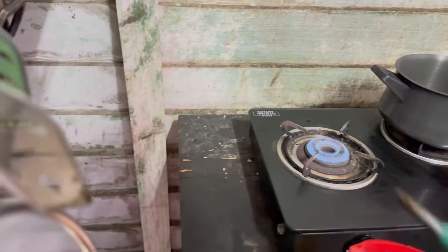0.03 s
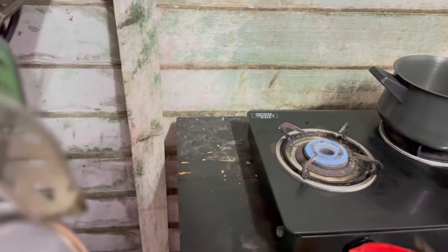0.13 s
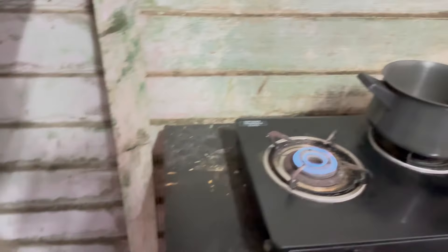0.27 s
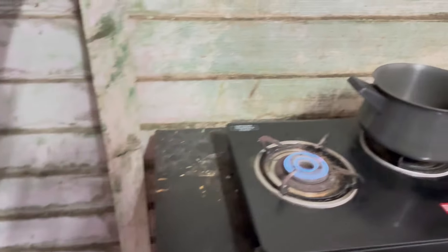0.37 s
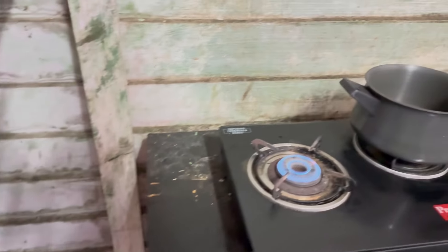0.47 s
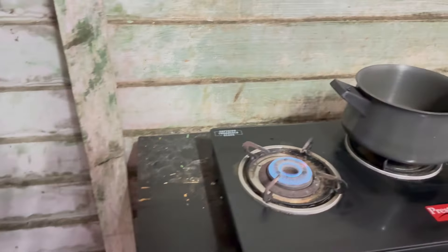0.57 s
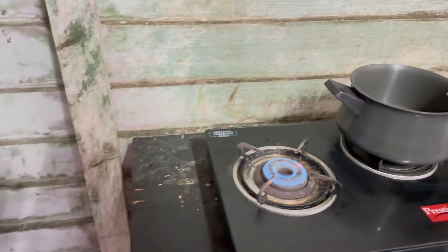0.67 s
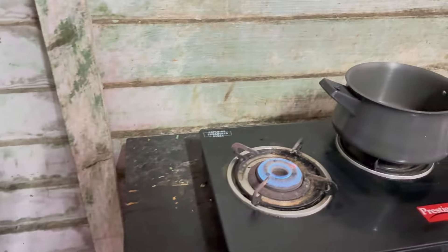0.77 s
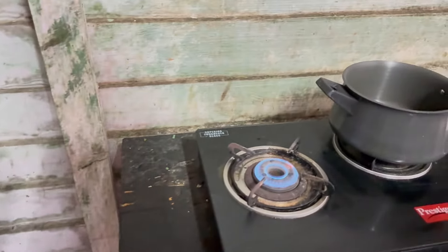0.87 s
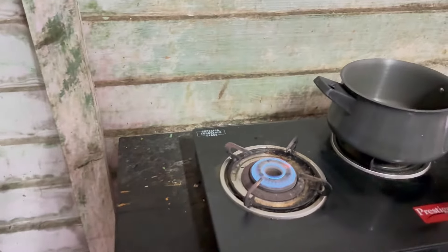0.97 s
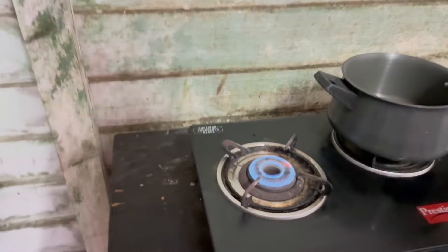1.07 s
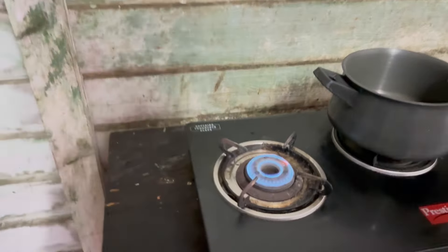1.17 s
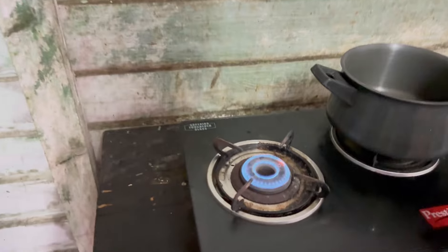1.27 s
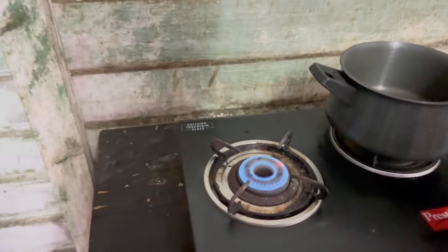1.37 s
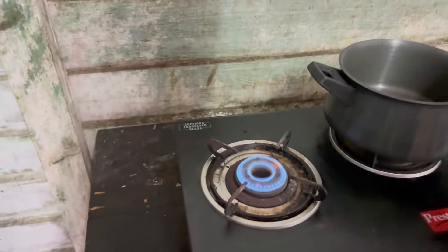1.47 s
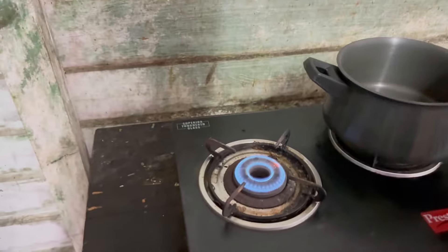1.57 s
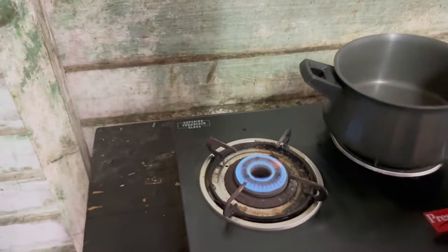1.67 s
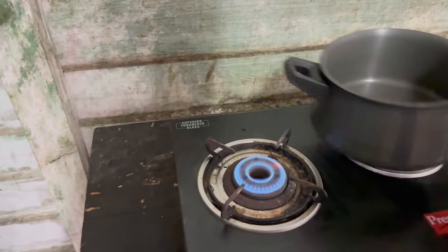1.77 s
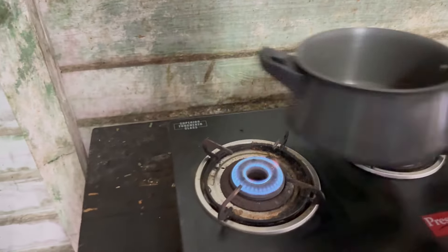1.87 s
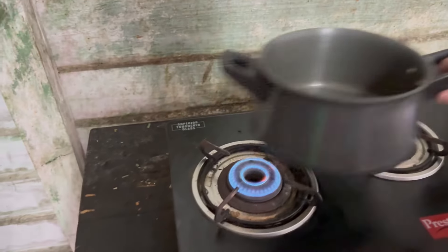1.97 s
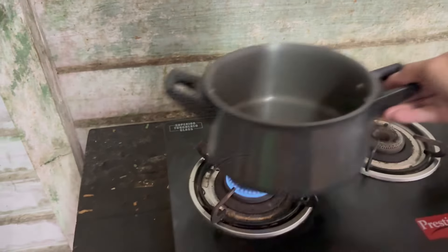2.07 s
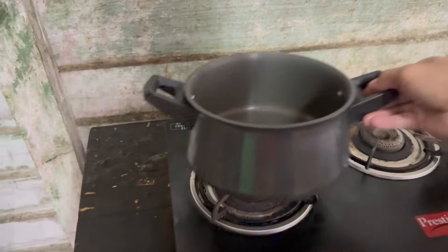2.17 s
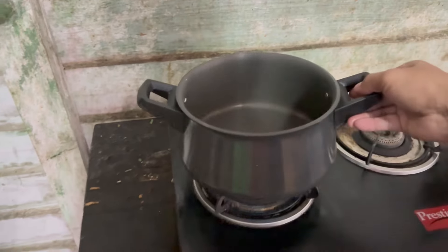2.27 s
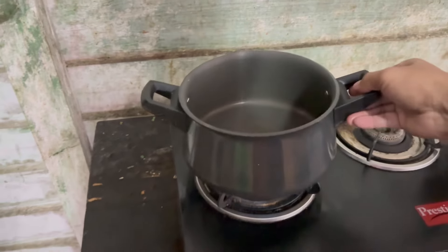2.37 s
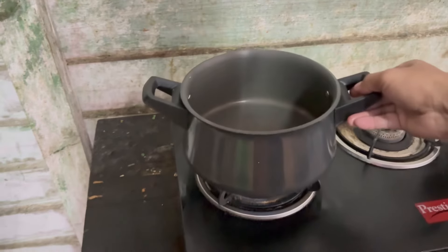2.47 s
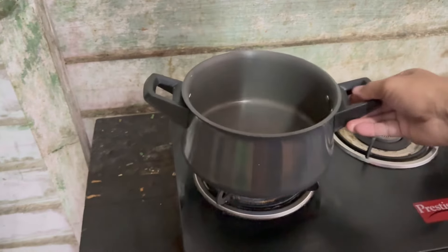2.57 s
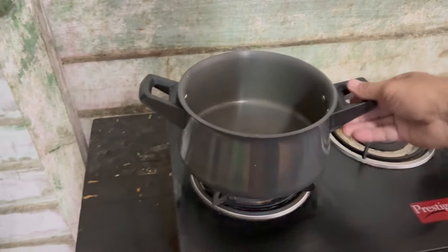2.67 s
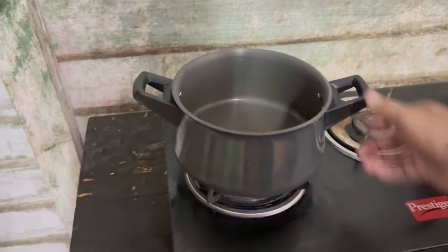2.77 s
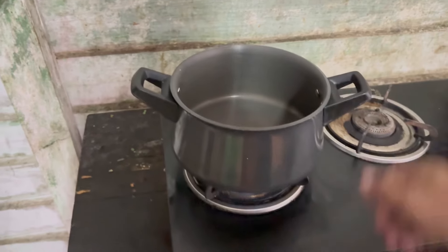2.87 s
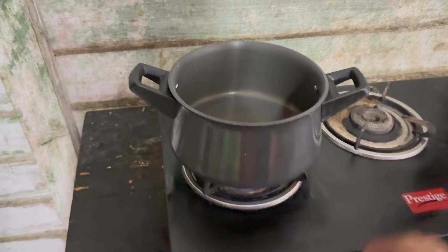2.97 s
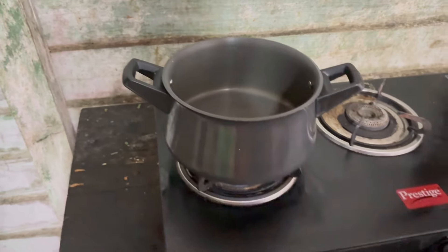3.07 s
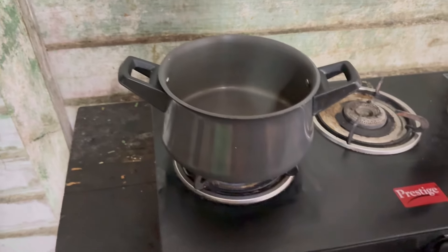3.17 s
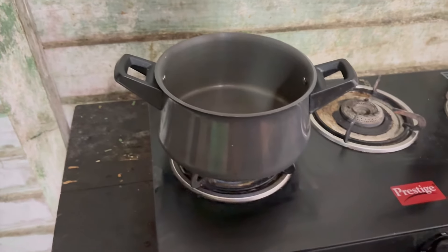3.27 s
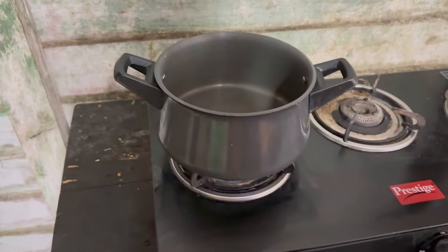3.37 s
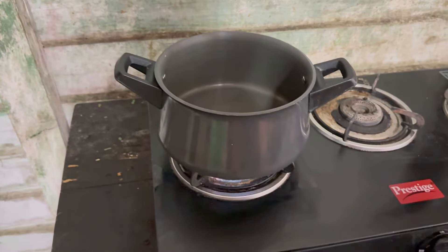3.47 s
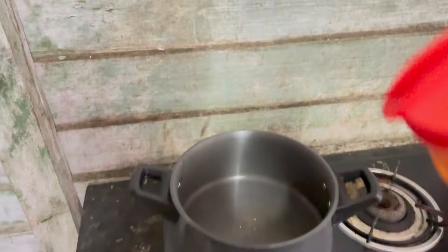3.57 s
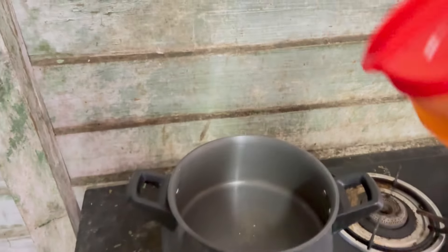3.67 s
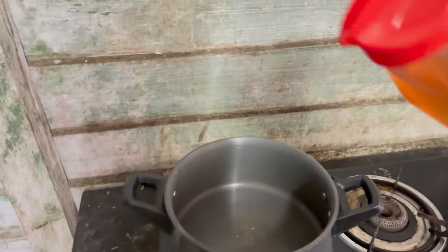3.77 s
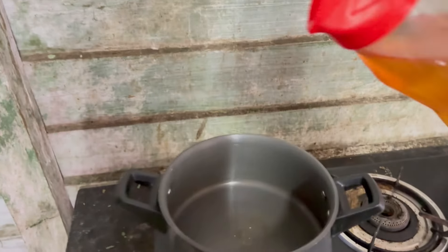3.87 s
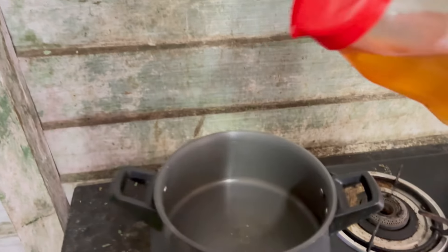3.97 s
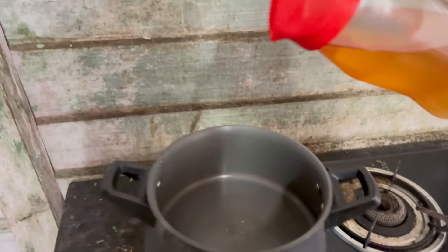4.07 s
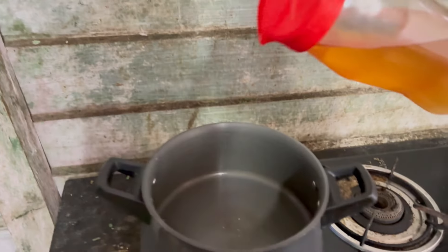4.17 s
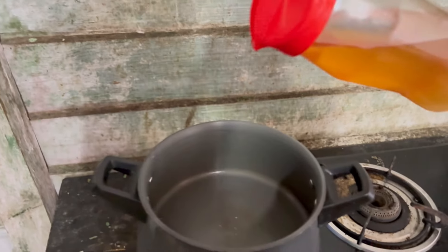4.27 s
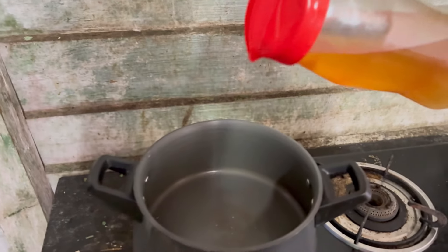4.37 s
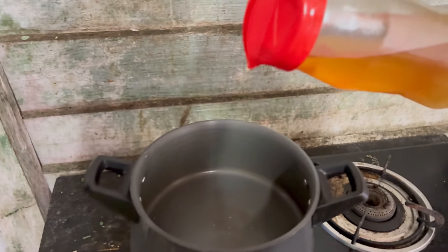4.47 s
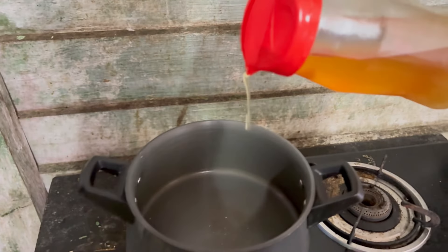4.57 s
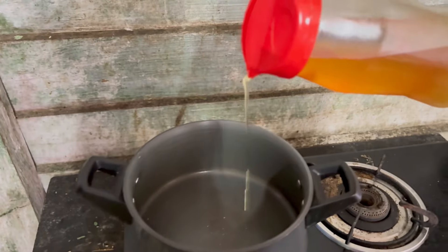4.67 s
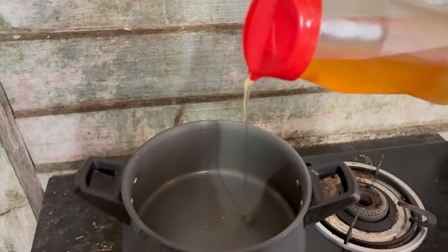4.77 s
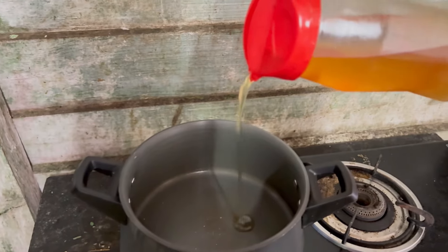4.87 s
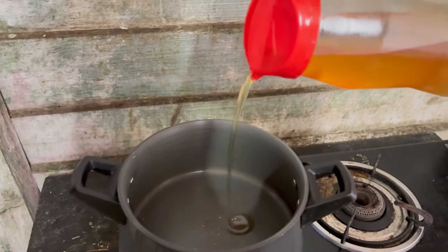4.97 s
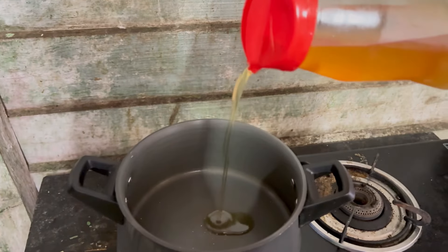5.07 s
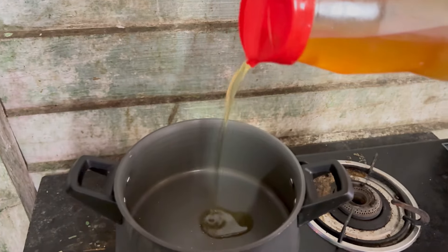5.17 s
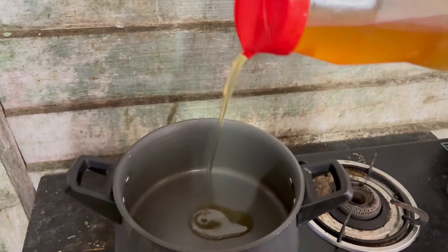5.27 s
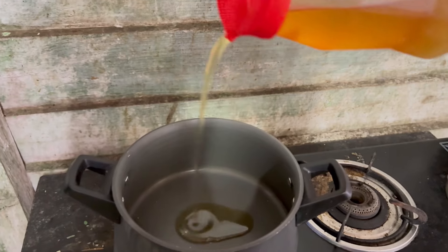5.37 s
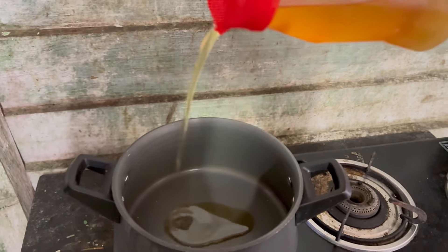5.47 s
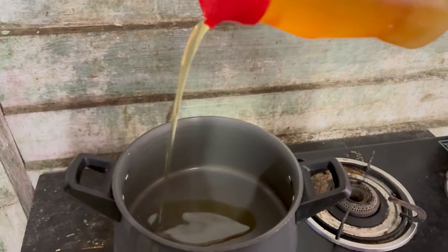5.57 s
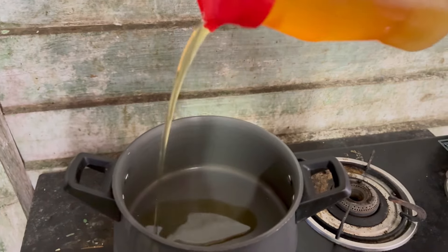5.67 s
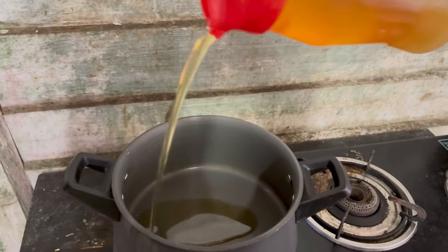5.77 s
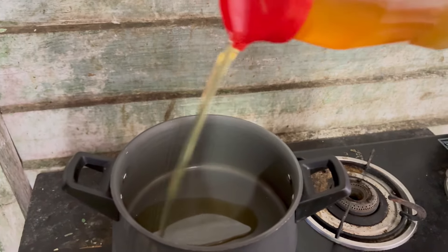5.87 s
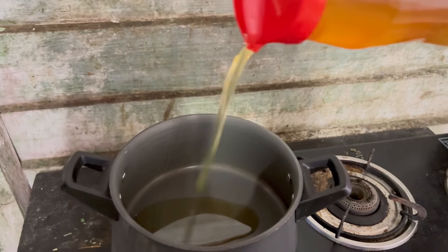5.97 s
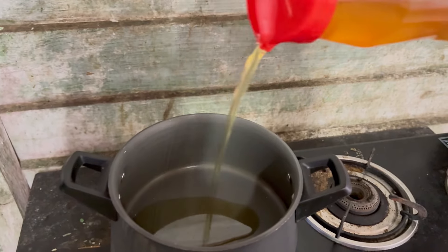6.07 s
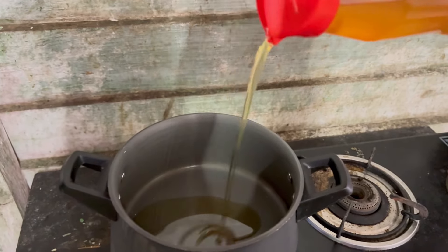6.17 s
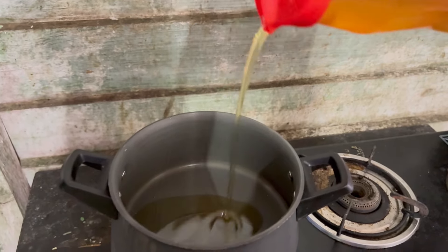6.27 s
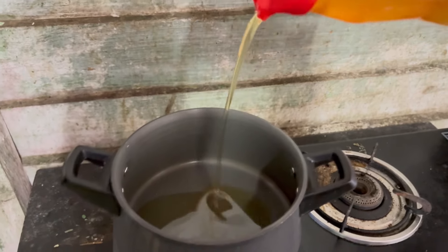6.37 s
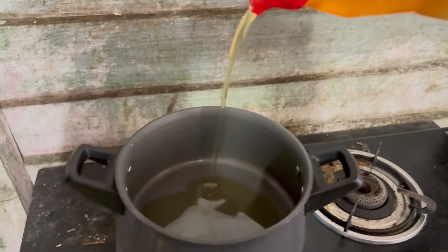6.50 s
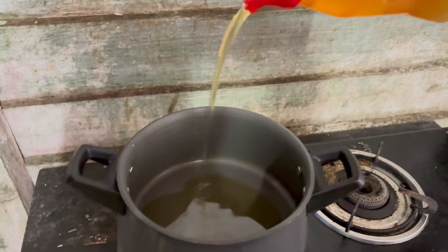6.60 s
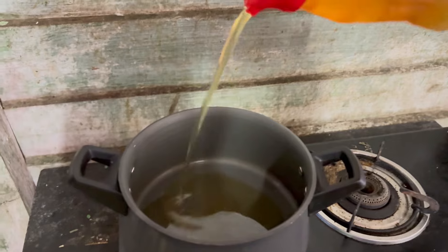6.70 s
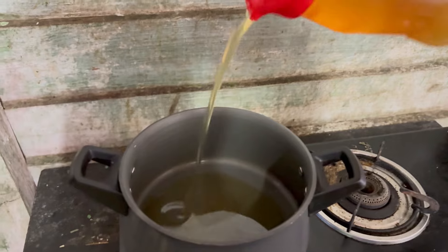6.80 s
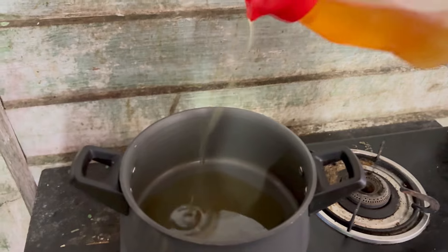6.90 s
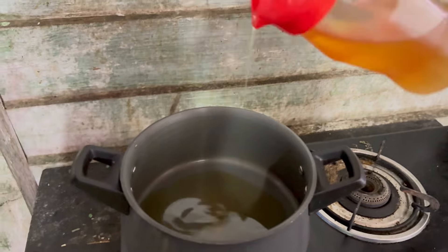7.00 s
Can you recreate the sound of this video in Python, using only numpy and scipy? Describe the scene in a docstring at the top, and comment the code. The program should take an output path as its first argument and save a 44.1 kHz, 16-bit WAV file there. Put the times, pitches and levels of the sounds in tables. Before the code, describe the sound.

A small kitchen, close stereo pickup, with a very quiet fluttering gas-flame rumble and a low steady hum throughout. At about 0.22 and 0.36 seconds a utensil clacks down twice, hard and woody-metallic, the second brighter, with a short room tail. From 1.25 to 1.65 a metal pot scrapes across a grate, gritty with a slight squeal and small ringing knocks. A very faint thin tone sinks while the pot is lifted. At 2.33 and again at 2.53 it lands in loud double clanks, ringing and booming deeply through the stove top; soft hollow low swells follow around 2.7 to 3.1. A tiny knock comes at 3.3, and from 3.4 the flame grows slightly fuller and hissier. Between 4.25 and 5.1 a plastic bottle makes small dry ticks, with one more at 6.74. From 6.5 oil patters almost silently until the end at about 7.

```python
"""Pot and oil at a gas stove

A utensil clacks down twice beside a lit gas stove; a metal pot is dragged off one burner and clanked onto the other.
The flame, filtered noise, rumbles and hisses under the pot over a low hum of sines. A plastic bottle ticks as it is
tipped, and oil trickles in almost silently as tiny pats. Blows are a contact pulse, dying modes and decaying noise.
A small kitchen, heard through two closely spaced microphones."""
import sys
import numpy as np
from scipy import signal
from scipy.fft import rfft, irfft, next_fast_len
from scipy.io import wavfile

SR = 44100
rng = np.random.default_rng(int(sys.argv[2]) if len(sys.argv) > 2 else 0)


def int16_out(signal):
    """Quantize to a 16-bit WAV file."""
    q = np.round(np.clip(np.atleast_2d(signal).T, -1, 1) * 32767)
    wavfile.write(sys.argv[1], SR, q.astype(np.int16))


N = 310361
T = np.arange(N) / SR

# Clacks of the utensil, before its overall gain: (time [s], thump [dB], body [dB], clang [dB], click [dB],
# room tail [dB], ringing modes against clatter [dB], pitch favoured by the point of contact [Hz])
UTENSIL_CLACKS = [(0.2233, -25, -16, -25, -30.5, -6, -1.5, 1185),
                  (0.364, -25.5, -17, -13, -31, -5, 1, 2117)]
# Knocks of the pot, before its overall gain: (time [s], strength [dB], thump [dB], brightness [dB],
# ringing modes against clatter [dB], pitch favoured by the point of contact [Hz])
POT_KNOCKS = [(1.229, -66, -72, 6.5, -8, 1790), (1.483, -36, -32, -3, 4.5, 880),
              (1.529, -52, -37.5, 13, 1, 2300), (1.604, -44.5, -33.5, -9, 4.5, 840),
              (1.637, -47.5, -32.5, 1.5, 0.5, 2220), (2.323, -25.5, -32, -0.5, 1.5, 1500),
              (2.334, -25.5, -22, 3, 0.5, 1400), (2.532, -21, -49.5, 4, 3, 2280),
              (2.547, -35.5, -29.5, -5.5, 4.5, 742), (3.308, -52, -69.5, 3, -6, 833)]


def amp(db):
    """Decibels to amplitude."""
    return 10 ** (np.asarray(db) / 20)


def evened(x):
    """Each channel at an RMS of one."""
    return x / np.sqrt(np.mean(x ** 2, -1, keepdims=True) + 1e-20)


def read(table, hz):
    """Every column of a table at the given frequencies, interpolated over log frequency."""
    f, *columns = np.transpose(table)
    return [np.interp(np.log(hz + 1), np.log(f + 1), c) for c in columns]


def add(mix, s, sound):
    """Lay a sound into the mix at a time in seconds, cut off at the end."""
    part = mix[:, round(s * SR):][:, :sound.shape[1]]
    part += sound[:, :part.shape[1]]


def onset(s, rise_s):
    """Gain that rises from 0 to 1 and stays."""
    return np.clip((T - s) / rise_s, 0, 1)


def stroke(s, length_s, attack_s, release_s):
    """Gain with an attack, a hold and a dying release."""
    return onset(s, attack_s) * np.exp(-np.maximum(T - s - length_s, 0) / release_s)


def swell(s, half_s, db):
    """Gain that swells to a peak and sinks again."""
    return amp(db) / np.cosh(np.clip(np.sqrt(2) * (T - s) / half_s, -50, 50))


def ports(x):
    """Two unrelated signals become a microphone pair: partly alike, the right side a little early."""
    # the pair: (frequency [Hz], left-right likeness [0-1], lead of the right side [ms], left minus right [dB])
    mic_pair = [(100, 0.97, 0.025, 3.5), (393.2, 0.83, 0.23, 0.5), (900, 0.48, 0.21, 3.5),
                (1900, .65, .09, -2.5), (2400, .6, .08, -2), (3241, 0.41, .27, 3.5), (6370, 0.42, .26, 7.5),
                (8700, 0.8, .255, -1.84), (10700, 1, .27, -0.1), (15000, 0.85, .285, 1.3)]
    count = next_fast_len(x.shape[1] + 8192)
    hz = np.fft.rfftfreq(count, 1 / SR)
    a, b = rfft(x, count)
    same, lead_ms, balance_db = read(mic_pair, hz)
    same = np.clip(same, 0, 1)
    left = a * np.exp(-2j * np.pi * hz * lead_ms / 1000)
    right = same * a + np.sqrt(1 - same ** 2) * b
    pair = [left * amp(balance_db / 2), right * amp(-balance_db / 2)]
    return irfft(pair, count)[:, :x.shape[1]]


def noise(spectrum):
    """Two unrelated noises of one colour, each at an RMS of one."""
    count = next_fast_len(N)
    colour = amp(read(spectrum, np.fft.rfftfreq(count, 1 / SR))[0])
    white = rfft(rng.standard_normal((2, count)))
    return evened(irfft(white * colour, count)[:, :N])


def ring(modes, t, favoured_hz=0, favour_db=7, favour_width=0.045, rise_cycles=1.8, spread_db=1):
    """Dying modes; the low ones build more slowly, and the point of contact favours those near one pitch."""
    hz, db, t60 = np.transpose(modes)[:, :, None]
    favour = favour_db * np.exp(-((favoured_hz / hz - 1) / favour_width) ** 2)
    db = db + favour + spread_db * rng.standard_normal(hz.shape)
    size = amp(db - 60 * t / t60) * (1 - np.exp(-t * hz / rise_cycles))
    angle = 2 * np.pi * (hz * t + rng.random(hz.shape))
    # a quarter cycle apart, with random sign, so the two channels are unrelated
    first = size * np.sin(angle)
    second = size * np.cos(angle) * rng.choice([-1, 1], hz.shape)
    return np.array([first, second]).sum(1)


def clatter(body, t, tail_db, crack_db, crack_s=.0015, rise_cycles=0.41, room_rise_s=.008):
    """Countless crowded modes: a crack at contact, a quick decay by band, then the kitchen's tail."""
    # the kitchen's reverberation: (frequency [Hz], t60 [s])
    kitchen = [(60, 0.12), (250, .36), (900, 0.48), (2000, 0.35), (5000, 0.27), (10000, 0.14),
               (15000, 0.23)]
    hz = np.fft.rfftfreq(len(t), 1 / SR)
    coloured = rfft(rng.standard_normal((2, len(t)))) * amp(read(body, hz)[0])
    centres, out = np.geomspace(60, 15000, 12), 0
    for centre, weights in zip(centres, np.eye(len(centres))):
        band = irfft(coloured * np.interp(np.log(hz + 1), np.log(centres), weights), len(t))
        direct = amp(-60 * t / read(body, centre)[1]) + amp(crack_db) * np.exp(-t / crack_s)
        room = amp(tail_db - 60 * t / read(kitchen, centre)[0]) * (1 - np.exp(-t / room_rise_s))
        out = out + band * np.hypot(direct, room) * (1 - np.exp(-t * centre / rise_cycles))
    return out


def blow(body, modes, register_db, tail_db, ring_db, favoured_hz, crack_db, pulse_db, pulse_s, size, attack_s):
    """One impact: pulse, clatter and ring, with its thump, body, clang and click each brought to a set level."""
    # thump, body, clang and click: (lower edge [Hz], upper edge [Hz])
    registers = [(45, 250), (250, 1500), (1500, 3500), (3500, 16000)]
    t = np.arange(size) / SR
    u = t / pulse_s
    pulse = evened(u * (2 - u) * np.exp(-u)) * np.array([[1], [0]])  # one push and pull of the air
    crowd = evened(clatter(body, t, tail_db, crack_db))
    ringing = amp(ring_db) * evened(ring(modes, t, favoured_hz))
    sound = ports(amp(pulse_db) * pulse + crowd + ringing)
    attack, out = np.clip(2 - 2 * t / attack_s, 0, 1), 0
    for edges, db in zip(registers, register_db):
        sos = signal.butter(3, edges, "band", fs=SR, output="sos")
        part = signal.sosfilt(sos, sound)
        loudness = np.sqrt(np.average((part ** 2).mean(0), weights=attack))
        out = out + amp(db) * part / loudness
    return out


def knock_levels(strength_db, thump_db, bright_db):
    """Thump, body, clang and click of a pot knock: a bright one trades body for click."""
    body_db, click_db = 1.5, -8.5  # against the clang, for a knock of plain brightness
    return thump_db, strength_db + body_db - bright_db, strength_db, strength_db + click_db + bright_db


def hum():
    """A few steady low sines, as from a small motor somewhere in the kitchen."""
    # (frequency [Hz], RMS level [dB])
    hum_tones = [(94, -60), (117.5, -68.5), (274.3, -78)]
    tones = sum(np.sqrt(2) * amp(db) * np.sin(2 * np.pi * (hz * T + rng.random())) for hz, db in hum_tones)
    return np.outer([1, 0], tones)


def flame_and_soft_noise(flutter_db=-3.54):
    """A low fluttering rumble, with broad noise and hiss that grow once the flame plays along the pot's base."""
    # colours of the three noises: (frequency [Hz], relative level [dB per Hz])
    rumble_colour = [(20, -24.5), (45, -1), (72, -4), (93, -1.5), (140, -2), (180, -6), (280, -12.5),
                     (450, -23.5), (1000, -30.5), (3000, -39.5), (15000, -46)]
    broad_colour = [(150, 3), (350, 5), (600, 0), (1000, -2), (1700, -2), (2700, -14), (4500, -19),
                    (8000, -19.5), (15000, -34)]
    hiss_colour = [(2000, -26), (6500, -17.5), (8500, -4), (11000, 4.5), (12500, -2), (14500, -0.5),
                   (16000, -14)]
    # swells of soft broad noise, as the pot is dragged, later under the pot:
    # (peak time [s], half length [s], level [dB])
    soft_swells = [(1.51, .22, -67), (4.501, 0.8, -63), (6.85, 0.43, -69)]
    catch_s, catch_rise_s = 3.39, 0.11  # the flame starts to play along the pot's base
    rumble_free_db, rumble_covered_db = -65.5, -62.5
    broad_free_db, broad_covered_db = -81, -77  # these add up as powers
    hiss_free_db, hiss_covered_db = -94, -71.5  # these add up as amplitudes

    flutter = amp(flutter_db * evened(noise([(1, -6.0), (8, 0.0), (20, -24), (60, -79)])[0]))
    covered = onset(catch_s, catch_rise_s)
    rumble = amp(rumble_free_db + covered * (rumble_covered_db - rumble_free_db))
    swells_power = sum(swell(*row) ** 2 for row in soft_swells)
    broad = np.sqrt(amp(broad_free_db) ** 2 + (covered * amp(broad_covered_db)) ** 2 + swells_power)
    hiss = amp(hiss_free_db) + covered * amp(hiss_covered_db)
    return flutter * rumble * noise(rumble_colour) + broad * noise(broad_colour) + hiss * noise(hiss_colour)


def hollow_tones():
    """A low hollow sound, narrow noise, swells now and then with more or less of its overtone."""
    # colours of the low sound and its overtone: (frequency [Hz], relative level [dB per Hz])
    hollow_colour = [(180, -13.5), (265, -1), (335, 5.5), (385, -10.5), (480, -29.5), (1000, -85)]
    overtone_colour = [(300, -35.5), (420, 0.5), (530, 1), (640, -8.5), (850, -12.5), (1400, -57.5)]
    # (peak time [s], half length [s], level [dB], overtone level [dB])
    hollow_swells = [(2.703, 0.057, -48.5, -51.5), (2.963, 0.073, -63.5, -75), (3.095, 0.071, -56, -117),
                     (3.333, 0.046, -63.5, -92), (4.777, 0.015, -47, -74), (4.934, 0.069, -56.5, -67),
                     (5.734, 0.09, -58.5, -65)]
    low = sum(swell(s, half_s, db) for s, half_s, db, _ in hollow_swells)
    high = sum(swell(s, half_s, db) for s, half_s, _, db in hollow_swells)
    return low * noise(hollow_colour) + high * noise(overtone_colour)


def thin_tone(attack_s=0.16, release_s=.03, waver_share=.7):
    """A thin wavering sine sinks ever faster and fades while the pot is in the air."""
    start_s, length_s, start_db = 1.66, .66, -75.5
    start_hz, sag_hz_per_s2, fade_db_per_s = 1280, 520, 17
    age = np.clip(T - start_s, 0, length_s)
    hz = start_hz - sag_hz_per_s2 * age ** 2
    waver = 1 + waver_share * noise([(1, -2.5), (15, -3.5), (60, -24), (200, -75.5)])
    gain = amp(start_db - fade_db_per_s * age) * stroke(start_s, length_s, attack_s, release_s)
    return gain * waver * np.sin(2 * np.pi * np.cumsum(hz) / SR)


def oil(drops_per_s=70):
    """The thick stream patters softly on the pot's floor: random drops, each a short ring."""
    pour_s, pour_rise_s, oil_db = 6.5, .12, -83
    drops = rng.standard_normal((2, N)) * (rng.random(N) < drops_per_s / SR)
    # modes of one pat: (Hz, dB, t60 s)
    pat = ring([(740, -3.0, .03), (1290, 31.0, 0.022), (1790, 9.0, 0.0067), (2000, -3.5, 0.052),
                (4340, -17.0, 0.017)], np.arange(2048) / SR)
    patter = evened(signal.oaconvolve(drops, pat, axes=1)[:, :N])
    return amp(oil_db) * onset(pour_s, pour_rise_s) * patter


def bottle():
    """The tipped plastic bottle gives in small dry ticks; the stronger ones are harder."""
    # (time [s], strength [dB], click [dB])
    ticks = [(4.251, -64, -60), (4.414, -58, -76), (4.44, -60.5, -76), (4.47, -60.5, -76),
             (4.496, -59, -78), (4.523, -58, -85), (4.608, -53, -89), (4.652, -54.5, -91),
             (4.686, -58, -74), (4.707, -51, -74), (4.813, -48.5, -68.5), (4.849, -52, -82),
             (4.94, -50, -71), (5.076, -48.5, -65), (6.739, -45.5, -57)]
    # the bottle's modes: (frequency [Hz], relative level [dB], t60 [s])
    bottle_modes = [(129.7, 12, 0.094), (159.6, 9.5, 0.085), (232.3, 1.5, 0.085), (325, -8, 0.084),
                    (725, 3.5, 0.034), (1110, 6, 0.0095), (2110, 2, 0.02)]
    # its dense response: (frequency [Hz], relative level [dB per Hz], t60 [s])
    bottle_body = [(50, -25, .08), (152, 25, 0.043), (616, 10, 0.072), (1500, 4, 0.11), (2630, 2, 0.058),
                   (3870, -13, 0.12), (8700, -17, 0.022), (15500, -15, .012)]
    firm_db, thump_db, clang_db = -48, 2.2, -2  # a firm tick, and its thump and clang against its body
    hardening = 0.39  # dB more clang against the body for each dB of strength
    out = np.zeros((2, N))
    for s, db, click_db in ticks:
        register_db = db + thump_db, db, db + clang_db + hardening * (db - firm_db), click_db
        add(out, s, blow(bottle_body, bottle_modes, register_db, tail_db=-10.5, ring_db=4.5, favoured_hz=0,
                         crack_db=14.0, pulse_db=-21.5, pulse_s=0.00038, size=8192, attack_s=0.025))
    return out


def afterring(below_db=-32, t60=1.5):
    """Hard blows leave a faint bright shimmer, decaying noise, in the stove's sheet metal."""
    clicks = [(s, click_db) for s, _, _, _, click_db, *_ in UTENSIL_CLACKS]
    clicks += [(s, knock_levels(*knock)[-1]) for s, *knock, _, _ in POT_KNOCKS]
    power = sum((T > s) * amp(click_db + below_db - 60 * abs(T - s) / t60) ** 2 for s, click_db in clicks)
    return np.sqrt(power) * noise([(1200, -19), (2100, -1.5), (2900, -6.5), (4400, -0.5), (6800, -5.0),
                                   (9000, -8), (15000, -25.5)])


def drag(slips_per_s=900, grit_db=-10):
    """The pot's base scrapes over the grate: small slips sound its wall, and a stroke that bites squeals."""
    # strokes over the grate: (start [s], length [s], level [dB], squeal against the stroke [dB])
    drags = [(1.253, 0.085, -48.5, -24), (1.402, .22, -45.5, -7)]
    slips = rng.standard_normal((2, N)) * rng.exponential(1, N) * (rng.random(N) < slips_per_s / SR)
    wall = ring([(789, 13, 0.097), (1253, 2, .04), (1594, 0.0, .04), (1810, 0.0, 0.034), (2500, -6, .04)],
                np.arange(8192) / SR)
    grit = amp(grit_db) * noise([(300, 12), (1500, -5.0), (3000, -13.0), (8000, -10.5), (15000, -20)])
    squeal = evened(signal.oaconvolve(slips, wall, axes=1)[:, :N])
    out = 0
    for s, length_s, db, squeal_db in drags:
        gain = amp(db) * stroke(s, length_s, attack_s=0.024, release_s=.045)
        out = out + gain * (amp(squeal_db) * squeal + grit)
    return out


def utensil(gain_db=-2.5):
    """Two hard clacks excite the modes and dense response of the counter."""
    # the counter's modes: (frequency [Hz], relative level [dB], t60 [s])
    counter_modes = [(106, -10, .3), (153.25, 4.5, 0.22), (223, -9.5, 0.23), (315.8, -3.5, 0.2),
                     (382, -5.5, 0.32), (542.6, -1.5, .25), (597, -6.5, .16), (755, -10, 0.38),
                     (801, -4.5, 0.26), (1045, -4.5, 0.085), (1103, -11, .3), (1069, -6.5, .25),
                     (1225, -2.5, .17), (1371, -11.5, 0.11), (1496, -6, 0.27), (1596, -10, .2),
                     (1970, -10.5, 0.051), (2070, 7, .035), (2300, 6, .025), (2420, 0, .04),
                     (2610, -11.5, 0.083), (2820, -15.5, .09), (5760, -30.5, 0.2)]
    # its dense response: (frequency [Hz], relative level [dB per Hz], t60 [s])
    counter_body = [(50, -10.5, .25), (148.56, 4, .2), (450, 3.5, 0.19), (1150, 2, .12), (2240, -6, 0.072),
                    (2900, -14.5, .06), (4630, -32, 0.21), (8600, -21.5, 0.046), (15230, -31, 0.039)]
    out = np.zeros((2, N))
    for s, *register_db, tail_db, ring_db, favoured_hz in UTENSIL_CLACKS:
        add(out, s, blow(counter_body, counter_modes, register_db, tail_db, ring_db, favoured_hz,
                         crack_db=4.0, pulse_db=-18.5, pulse_s=0.00021, size=32768, attack_s=0.034))
    return amp(gain_db) * out


def pot(gain_db=1, boom_hz=75, boom_t60=0.31, boom_rise_s=0.013):
    """The pot knocks on the burner grates: its wall rings, and its full weight booms the stove top."""
    # the pot's modes: (frequency [Hz], relative level [dB], t60 [s])
    pot_modes = [(111.6, -1, 0.32), (147.9, 9, 0.19), (264.7, -6.5, 0.33), (352, 0, 0.15),
                 (418.6, -3.5, 0.27), (536.6, -4, 0.14), (748, 3, 0.24), (815, -4, 0.1), (949, -7.5, 0.14),
                 (1164, -14, 0.45), (1200, -17, 0.32), (1272, 0, 0.082), (1362, -16, 0.26),
                 (1450, -4, 0.26), (1535, -11, .2), (1730, 1, 0.074), (2000, -21, 0.78), (2170, -5, .26),
                 (2204, 0, .33), (2262, -4, .27), (2330, -6, .18), (2770, -5.5, 0.12), (3100, -3, 0.086),
                 (3300, -20, 0.167), (3940, -19.5, 0.22), (4700, -18.5, .17), (4900, -28, 0.16),
                 (5900, -22.5, 0.202), (6000, -21, 0.25), (7820, -12.5, 0.088), (8700, -28.5, 0.13),
                 (11160, -35, 0.31)]
    # its dense response: (frequency [Hz], relative level [dB per Hz], t60 [s])
    pot_body = [(50, -5, .22), (150, 3, 0.04), (392, 11, 0.041), (1350, 4.5, 0.1), (2640, 9.5, 0.062),
                (3960, -13, 0.22), (6500, -15, 0.15), (11000, -17, 0.031), (15500, -26.5, .07)]
    # the full weight flexes the stove top: (time [s], level before the gain [dB])
    booms = [(2.335, -24.5), (2.555, -22.5)]
    out, t = np.zeros((2, N)), np.arange(SR) / SR
    for s, strength_db, thump_db, bright_db, ring_db, favoured_hz in POT_KNOCKS:
        register_db = knock_levels(strength_db, thump_db, bright_db)
        add(out, s, blow(pot_body, pot_modes, register_db, -12.5, ring_db, favoured_hz,
                         crack_db=-7.5, pulse_db=-19.5, pulse_s=0.00014, size=32768, attack_s=0.016))
    boom = np.sin(2 * np.pi * boom_hz * t) * amp(-60 * t / boom_t60) * (1 - np.exp(-t / boom_rise_s))
    for s, db in booms:
        add(out, s, amp(db) * ports(np.outer([1, 0], boom)))
    return amp(gain_db) * out


def scene():
    """The blows and the quieter sounds of the stove, all through the microphone pair."""
    quiet = hum() + flame_and_soft_noise() + hollow_tones() + thin_tone() + oil() + afterring() + drag()
    return ports(quiet) + bottle() + utensil() + pot()  # each blow has already passed through the pair


def record(dry):
    """Peaks stop at full scale; then a low-pass sets the band limit."""
    edge_hz = 15900
    lowpass = signal.firwin(255, edge_hz, window=("kaiser", 8), fs=SR)
    return signal.oaconvolve(np.clip(dry, -1, 1), lowpass[None], "same")


dry = scene()
out = record(dry)
int16_out(out)
```